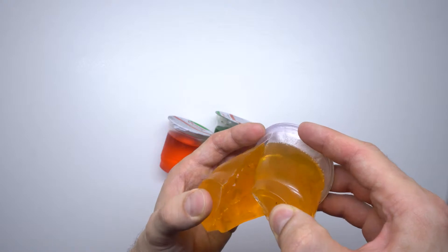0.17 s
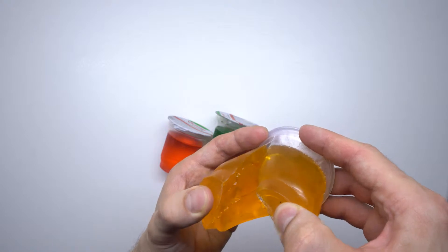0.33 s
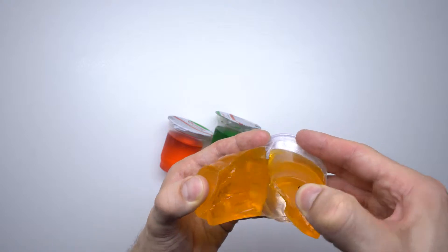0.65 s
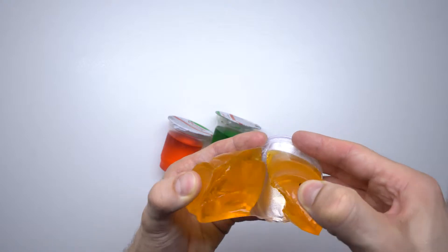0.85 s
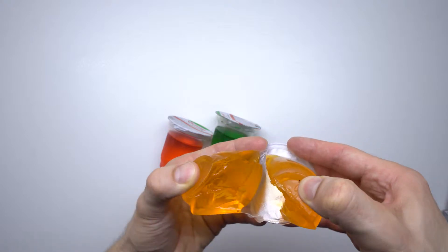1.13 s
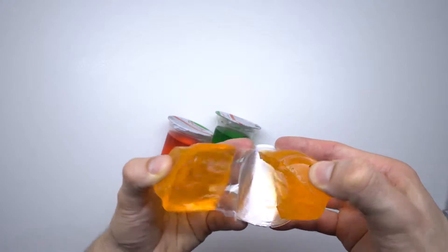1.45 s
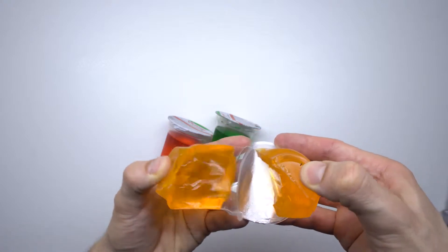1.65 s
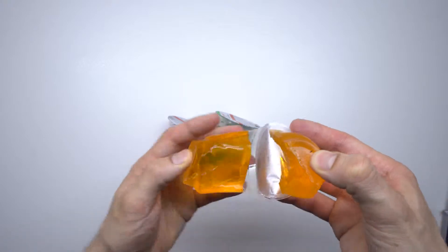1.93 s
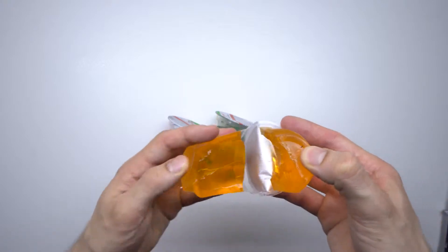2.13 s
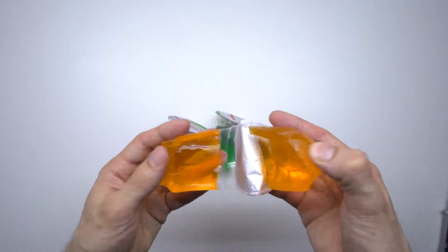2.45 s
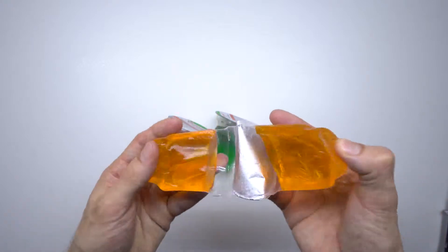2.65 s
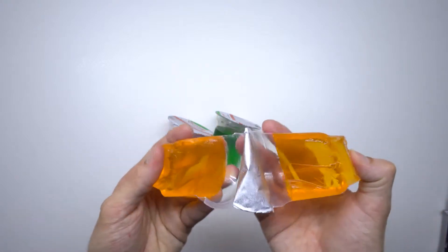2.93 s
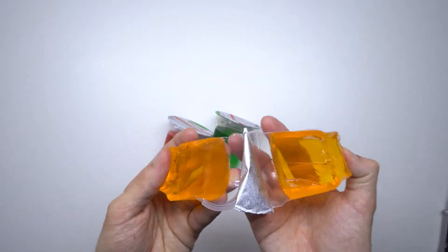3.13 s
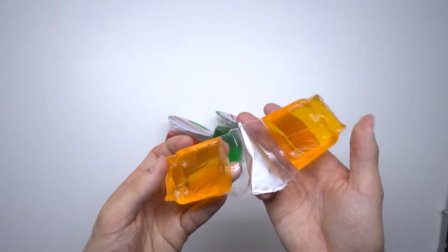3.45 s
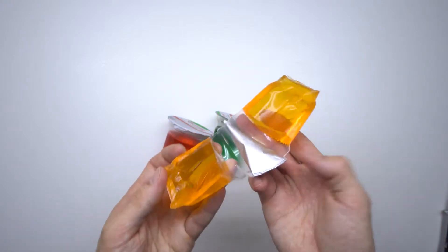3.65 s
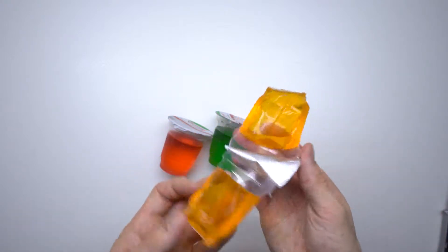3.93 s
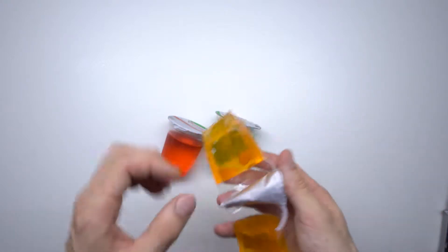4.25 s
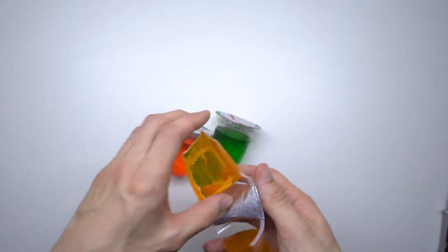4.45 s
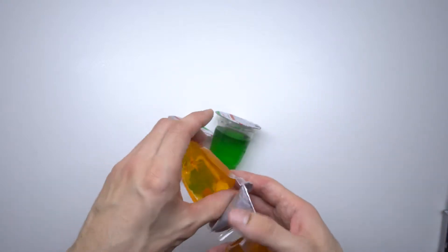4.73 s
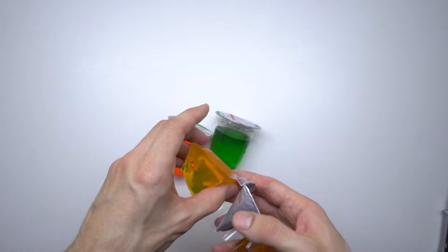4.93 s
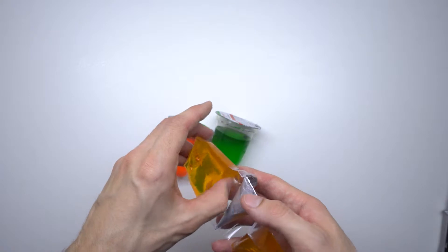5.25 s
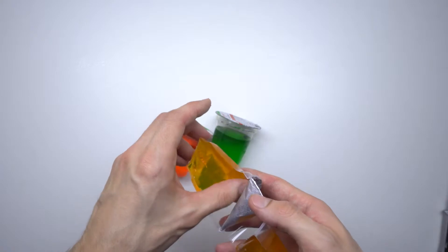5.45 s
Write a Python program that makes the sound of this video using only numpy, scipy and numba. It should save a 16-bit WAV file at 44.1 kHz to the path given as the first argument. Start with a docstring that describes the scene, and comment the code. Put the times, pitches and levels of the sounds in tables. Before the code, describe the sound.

Close, sharp plastic snaps and crackling as fingers pull a foil-lidded jelly cup apart in a small echoing room.

```python
"""In a small echoing room, close by, two hands pull apart thin plastic cups of jelly.
Cup walls buckle with loud snaps, the lid seam crackles as it slips, and fingers rub over plastic
and foil. Air pockets in the jelly pop, and soft bumps set a cup ringing, all over a faint hiss and hum.
A limiter turns the sound down on the hardest snaps, so the room swells up behind them."""
import sys
import numpy as np
from scipy import signal
from scipy.fft import rfft, irfft
from scipy.io import wavfile
from numba import njit

SR = 44100
rng = np.random.default_rng(int(sys.argv[2]) if len(sys.argv) > 2 else 0)


def put_to_file(sound):
    """Save the sound as 16-bit audio at rate SR, in the file named by the first command-line argument."""
    columns = np.atleast_2d(sound).T  # one column per channel
    safe = np.clip(columns, -1, 1)
    whole_steps = np.round(safe * 32767)
    wavfile.write(sys.argv[1], SR, whole_steps.astype(np.int16))


N = 246060
T = np.arange(N) / SR
RING_TIME = T[:4096]  # the seconds over which one blow rings
IMPULSE = signal.unit_impulse(len(RING_TIME))
# the tone of a cracking crease: pitch_hz, level_db
CREASE_TONE = [(200, -9), (700, -16.5), (1300, -3), (2300, 3.5), (3600, -1), (5200, 1), (7000, -4),
               (8500, -0.5), (11000, -8), (13000, -5), (15000, -2), (16500, -51)]


def gain(db):
    """Turn decibels into a number to multiply by."""
    return 10 ** (np.asarray(db) / 20)


def unit(x):
    """Scale a sound to an average strength (rms) of 1."""
    return x / np.sqrt(np.mean(x ** 2) + 1e-18)


def add(track, start_s, sound):
    """Mix a sound into a track."""
    i = max(int(start_s * SR), 0)
    track[i:i + len(sound)] += sound[:max(N - i, 0)]


def fade(fade_s, t=RING_TIME):
    """Die away by 60 dB in fade_s seconds."""
    return np.exp(-np.log(1000) * t / max(fade_s, 1e-4))


def colour(x, tone, size=2048):
    """Filter a sound to follow a tone curve of (pitch_hz, level_db) points."""
    hz, db = np.transpose(tone)
    freqs = np.maximum(np.fft.rfftfreq(size, 1 / SR), 1)
    cepstrum = irfft(np.log(gain(np.interp(np.log(freqs), np.log(hz), db))))
    cepstrum[1:size // 2] *= 2  # folded so the filter rings only after a hit
    cepstrum[size // 2 + 1:] = 0
    return signal.fftconvolve(x, irfft(np.exp(rfft(cepstrum))))[:len(x)]


def resonate(x, hz, width_hz):
    """Keep the part of a sound near one pitch."""
    return signal.lfilter(*signal.iirpeak(hz, hz / width_hz, fs=SR), x)


def split_bands(x):
    """Split a sound into equally strong bass, middle and treble."""
    bands = [(250, 1200), (1200, 4000), (4000, 17000)]  # low_hz, high_hz
    return [unit(signal.sosfilt(signal.butter(3, b, "band", fs=SR, output="sos"), x)) for b in bands]


def wander(t, per_s):
    """Drift to a new random value per_s times a second."""
    return np.interp(t * per_s, np.arange(len(t)), rng.standard_normal(len(t)))


def background():
    """Steady hiss and rumble with a wavering low hum."""
    # the tone of the quiet room: pitch_hz, level_db
    air_tone = [(12, -26), (20, 0.5), (130, -7), (172, -6), (204, -8.5), (337, -12.5), (499, -14),
                (624, -17.5), (1120, -23.5), (1330, -20.5), (3250, -28), (8650, -32), (16000, -37.5)]
    air = unit(colour(rng.standard_normal(N), air_tone, size=8192))
    hum = unit(resonate(rng.standard_normal(N), hz=50, width_hz=9))
    return gain(-45) * air + gain(-50) * hum


def burst(tick_s, tail_s, tail_db):
    """A thin sheet lets go sharply, then shivers for a moment."""
    return rng.standard_normal(len(RING_TIME)) * (fade(tick_s) + gain(tail_db) * fade(tail_s))


def foil_ticks(ticks_per_s=14):
    """Foil ticks faintly between the fingers at random moments."""
    moments = rng.random(N) < ticks_per_s / SR
    strength = gain(-44 + 4 * np.minimum(rng.exponential(size=N), 3))
    tick = colour(burst(tick_s=0.0053, tail_s=0.02, tail_db=-34), CREASE_TONE)
    return signal.fftconvolve(moments * strength, tick)[:N]


def crease_crack(push, edge_hz):
    """A crease flips with a noisy crack; softer ones have a lower edge_hz and sound duller."""
    return unit(signal.lfilter(*signal.butter(1, edge_hz, fs=SR), colour(push, CREASE_TONE)))


def thin_wall(x, corner_hz):
    """A small thin wall gives off little sound below corner_hz."""
    return signal.lfilter(*signal.butter(2, corner_hz, "high", fs=SR), x)


def wall_snaps(body_hz=170):
    """A cup wall flips: it cracks, rings and pushes air. Returns the close sound and the room's share."""
    # buckling walls: start_s, level_db, pitch_hz, fade_s, crack_db, edge_hz, thump_db, room_db
    snaps = [(0.1173, 7.5, 1960, 0.0031, 0.5, 11600, -20, -1), (1.506, 11, 1852, 0.01, 1.5, 4860, -4, -11),
             (1.5179, 4.5, 2080, 0.0037, 5, 7400, -33, -0.5),
             (1.879, -21.5, 2880, 0.013, -2.5, 3870, -46, 1),
             (2.715, -15, 1494, 0.027, 1.5, 3350, -17, 2.5), (3.0883, -23, 2790, 0.027, 1, 9100, -53, 5),
             (4.6095, -20, 3210, 0.014, -6, 6000, -44, 8.5), (4.65, -26, 1970, 0.068, -13, 4000, -18, 9),
             (4.6581, -14.5, 3610, 0.025, -6.5, 6000, -51, -1),
             (4.6767, -20.5, 2180, 0.015, -20, 4000, -33, -2),
             (4.7207, -12.5, 1425, 0.041, 0.5, 4070, -27, 6),
             (5.4423, -13.5, 2326, 0.029, -4, 3900, -26, 3.5),
             (5.4565, -17.5, 2220, 0.0086, -5.5, 3260, -32, 6),
             (5.544, -14, 2204, 0.039, -12, 2490, -58, 5.5), (5.5532, -15, 4080, 0.024, 4, 8500, -53, 2)]
    # a wall's side notes around its main one: pitch_ratio, level_db
    side_notes = [(0.678, -7), (0.86, -14), (1.216, -3), (1.501, -10.5)]
    near, far = np.zeros(N), np.zeros(N)
    thump = unit(resonate(IMPULSE, hz=270, width_hz=380))
    for start_s, db, hz, fade_s, crack_db, edge_hz, thump_db, room_db in snaps:
        phase = 2 * np.pi * hz * RING_TIME
        sides = sum(gain(d) * rng.choice([-1, 1]) * np.sin(ratio * phase) for ratio, d in side_notes)
        side_db = 5.5 - 400 * fade_s  # a long ring is a pure one
        ring = unit((np.sin(phase) + gain(side_db) * sides) * fade(fade_s))
        crack = crease_crack(burst(tick_s=0.012, tail_s=0.062, tail_db=-13), edge_hz)
        corner_hz = np.sqrt(body_hz * edge_hz)  # a smaller, sharper crease has less body
        snap = thin_wall(ring + gain(crack_db) * crack, corner_hz)
        add(near, start_s, gain(db) * (snap + gain(thump_db) * thump))
        # the room gathers the crack from all sides, which evens out its tone
        even_snap = gain(-0.5) * ring + gain(crack_db) * crease_crack(IMPULSE, edge_hz)
        add(far, start_s, gain(db + room_db) * thin_wall(even_snap, corner_hz))
    return near, far


def seam_slip(start_s, db, treble_db, rim_hz=1650, overtone_hz=3650):
    """One slip of the seam ticks and rings two notes of the cup's rim."""
    # the tone of the seam: pitch_hz, level_db
    seam_tone = [(150, -68), (250, -17), (444, -8), (1010, -7.5), (1100, 3), (1260, -2.5), (1640, 14.5),
                 (2130, 3), (3580, 0.5), (4410, -3.5), (5160, -3), (8850, -7), (11500, -13), (13700, -11.5),
                 (16000, -11.5)]
    # bass in a slip, fullest while the cup is squeezed shut: time_s, bass_db
    bass_curve = [(0.68, -4.5), (0.77, -1), (0.94, 0.5), (1.2, -7), (1.33, -12), (2.37, 4), (3.0, -15.5),
                  (4.2, -11)]
    tick = unit(colour(burst(tick_s=0.0015, tail_s=0.053, tail_db=-20), seam_tone))
    bend = 1 + 0.028 * rng.standard_normal()  # the rim bends a little differently each time
    turn = 2 * np.pi * bend * RING_TIME
    rim = unit((np.sin(rim_hz * turn) + gain(-9) * np.sin(overtone_hz * turn)) * fade(0.03))
    bass, middle, treble = split_bands(tick + gain(-8) * rim)
    bass_db = np.interp(start_s, *np.transpose(bass_curve))
    return gain(db - 10) * (middle + gain(bass_db) * bass + gain(treble_db) * treble)


def seam_crackles(gap_s=0.024, jitter=0.2, spread_db=6):
    """The seam lets go in single slips, and creeps in uneven runs of small ones."""
    # single slips of seam and foil: start_s, level_db, treble_db
    slips = [(0.6508, -30.5, -0.5), (0.6874, -29.5, -7.5), (0.712, -40, 0), (0.7332, -15.5, -2),
             (0.7417, -14, -1.5), (0.756, -14, -6), (0.7609, -15.5, 1.5), (0.7707, -17.5, -8),
             (0.8353, -21, -2), (0.898, -24, -2.5), (0.9007, -14.5, -2.5), (0.9098, -15, -3),
             (0.9201, -22, -8), (0.9321, -21.5, -4), (0.9632, -17.5, 9), (0.9744, -29, 14.5),
             (1.1217, -29.5, -14), (1.1903, -17, 1), (1.2246, -16, -6.5), (1.278, -13, -9.5),
             (1.2996, -18, -6), (1.3111, -13, -10), (1.3317, -10.5, 0), (1.341, -13.5, -29),
             (1.8094, -27, -6), (2.1125, -35.5, -6), (2.3698, -37.5, -5.5), (2.6302, -34, -8),
             (2.6906, -39.5, -0.5), (3.006, -27, -18), (3.5009, -25, -18), (4.0434, -39, 1.5),
             (4.18, -33, -9), (4.205, -32, -6), (4.28, -36, -14), (4.5336, -17.5, -10), (4.9663, -49.5, 6),
             (5.1182, -59, 9), (5.179, -45.5, -17)]
    # runs of slips under a steady pull: start_s, length_s, level_db, treble_db
    creeps = [(0.457, 0.04, -37.5, -1.5), (0.715, 0.07, -43, 0), (1.247, 0.09, -40, -21),
              (2.127, 0.1, -48.5, -15), (2.77, 0.1, -38, -6), (3.388, 0.18, -32, -8)]
    out = np.zeros(N)
    for start_s, db, treble_db in slips:
        add(out, start_s, seam_slip(start_s, db, treble_db))
    for start_s, length_s, db, treble_db in creeps:
        for k, (late, louder) in enumerate(rng.standard_normal(size=(10, 2))):
            slip_s = start_s + (k + jitter * late) * gap_s
            pulling = k * gap_s < length_s
            add(out, slip_s, pulling * seam_slip(slip_s, db + spread_db * louder, treble_db))
    return out


def finger_pressure(t, length_s, swell_db, grab_s=0.0041, let_go_s=0.063):
    """A finger takes hold, presses harder or eases off, and lets go."""
    grab = 1 - np.exp(-t / grab_s)
    hold = gain(swell_db * (np.minimum(t / length_s, 1) - 0.5))
    return grab * hold * fade(let_go_s, np.maximum(t - length_s, 0))


def finger_rubs(slips_per_s=1300, catches_per_s=45, detune=0.0374):
    """Many tiny slips shake the sheet and the cup; sticky skin catches now and then."""
    # skin and foil sliding on plastic: start_s, length_s, level_db, swell_db, bass_db, treble_db
    strokes = [(0.935, 0.033, -20, -10, 4, 0.5), (2.009, 0.01, -39.5, 10, -2, 5),
               (2.899, 0.11, -34, 10.5, -33, -4), (3.135, 0.019, -27.5, 14.5, -24, -3),
               (3.218, 0.12, -24, -2, -12.5, -4.5), (3.347, 0.078, -18.5, 2, -20, -5.5),
               (3.499, 0.044, -20, -17, -25, -12.5), (3.535, 0.073, -23.5, 8.5, -15.5, -7),
               (3.745, 0.1, -29, 12, -21, -7), (3.814, 0.015, -13.5, 3.5, -15, -2.5),
               (4.056, 0.099, -33, 0, -10, -6.5), (4.22, 0.051, -26.5, -7.5, -10.5, -11.5),
               (4.302, 0.021, -34.5, 8, -24, -13), (4.53, 0.036, -11, 5.5, -15, -4.5),
               (4.584, 0.15, -16.5, 2, -6.5, -5.5), (5.276, 0.031, -44, -2, -24, -14),
               (5.357, 0.022, -25, 0, -28, -0.5), (5.409, 0.0097, -40, -2, -11, -16)]
    # the notes of the held cup: pitch_hz, width_hz, level_db
    cup_notes = [(1670, 260, 2.5), (2176, 76, 3), (2380, 21, -24), (3027, 204, 2), (4000, 180, -9),
                 (4550, 27, -16), (5420, 99, -33), (6000, 26, -16)]
    # the tone of rubbing: pitch_hz, level_db
    rub_tone = [(180, -68), (300, -38), (519, -10), (574, -48), (1640, -6.5), (1900, 2), (2840, 18.5),
                (3460, -21.5), (4230, -25), (7080, -35.5), (8500, -5.5), (16000, -70.5)]
    out, t = np.zeros(N), T[:SR // 2]
    for start_s, length_s, db, swell_db, bass_db, treble_db in strokes:
        slips = (rng.random(len(t)) < slips_per_s / SR) * rng.choice([-1, 1], len(t))
        slips = slips * gain(3 * np.minimum(rng.exponential(size=len(t)), 4))
        sheet_ring = rng.standard_normal(len(RING_TIME)) * fade(0.055)
        sheet = signal.fftconvolve(slips, sheet_ring)[:len(t)]
        shake = unit(slips) + gain(-1) * unit(sheet)
        # each hold tunes the cup and the rubbing a little differently
        cup = sum(gain(d) * resonate(shake, hz * (1 + detune * rng.standard_normal()), width_hz)
                  for hz, width_hz, d in cup_notes)
        stiffness = 1 + detune * rng.standard_normal()
        skin = colour(shake, [(hz * stiffness, d) for hz, d in rub_tone])
        catch_moments = rng.random(len(t)) < catches_per_s / SR
        catch = colour(burst(tick_s=0.0089, tail_s=0.017, tail_db=-7), CREASE_TONE)
        catches = signal.fftconvolve(catch_moments, catch)[:len(t)]
        grip = gain(2.2 * wander(t, per_s=130))  # an uneven grip bunches the slips
        sliding = grip * (unit(skin) + gain(-1) * unit(cup))
        bass, middle, treble = split_bands(sliding + gain(-17) * unit(catches))
        contact_db = 3 * wander(t, per_s=65)  # the touch turns harder and softer
        rub = middle + gain(bass_db) * bass + gain(treble_db + contact_db) * treble
        add(out, start_s, gain(db - 1) * finger_pressure(t, length_s, swell_db) * rub)
    return out


def jelly_pops(rise_s=0.00093):
    """Air pockets open with a soft start and a short hollow ring."""
    # pockets opening between jelly and cup: start_s, level_db, pitch_hz, fade_s
    pops = [(0.945, -14, 980, 0.013), (1.116, -30, 765, 0.014), (1.433, -6.5, 1055, 0.007),
            (1.677, -10.5, 1176, 0.011), (1.7452, -17.5, 824, 0.013), (1.85, -11, 876, 0.013),
            (1.865, -28, 546, 0.034), (2.572, -37, 522, 0.022), (2.5892, -18, 1132, 0.019),
            (3.052, -43, 480, 0.02)]
    # the notes of one pocket: pitch_ratio, level_db
    pocket_notes = [(1, 13), (1.45, 8), (1.68, -1), (2.4, -5)]
    out = np.zeros(N)
    for start_s, db, hz, fade_s in pops:
        ring = sum(gain(d) * np.sin(2 * np.pi * hz * ratio * RING_TIME) for ratio, d in pocket_notes)
        add(out, start_s, gain(db + 1) * ring * fade(fade_s) * (1 - np.exp(-RING_TIME / rise_s)))
    return out


def cup_knocks(rise_s=0.015):
    """Soft bumps set the whole cup ringing."""
    # bumps on the cup: start_s, level_db, pitch_ratio
    knocks = [(3.829, -22.5, 0.99), (3.846, -35, 0.95), (4.535, -29, 1.15), (4.56, -23.5, 1.02),
              (4.613, -24, 1)]
    # the notes of the whole cup: pitch_hz, level_db, fade_s
    shell_notes = [(532.4, -0.5, 0.16), (844, -13, 0.23), (1040, -2, 0.1), (1480, 12, 0.055),
                   (2045, 13, 0.13), (2550, -21, 0.055)]
    out, t = np.zeros(N), T[:SR // 4]
    for start_s, db, ratio in knocks:
        ring = sum(gain(d) * np.sin(2 * np.pi * (ratio * hz * t + rng.random())) * fade(fade_s, t)
                   for hz, d, fade_s in shell_notes)
        add(out, start_s, gain(db) * ring * (1 - np.exp(-t / rise_s)))
    return out


def hand_shift(peak_s=5.0, swell_s=0.11, hz=150, width_hz=140):
    """One hand shifts its hold with a soft low rustle."""
    rustle = resonate(resonate(rng.standard_normal(N), hz, width_hz), hz, width_hz)
    swell = np.exp(-((T - peak_s) / swell_s) ** 2)
    return gain(-46) * swell * unit(rustle)


def room_echo(x, build_s=0.0009, size=32768):
    """Echoes build up quickly and blur together; the deepest last longest."""
    # how the room rings: pitch_hz, level_db, fade_s
    room_bands = [(148, 0, 0.73), (516, 6.5, 0.27), (1410, 2, 0.36), (2520, -2, 0.44), (4840, -2.5, 0.35),
                  (8900, -2.5, 0.32), (15300, -6.5, 0.21)]
    t, freqs = T[:size], np.fft.rfftfreq(size, 1 / SR)
    noise = rfft(rng.standard_normal(size))
    centres = np.log([row[0] for row in room_bands])
    echo = 0
    for share, (_, db, fade_s) in zip(np.eye(len(room_bands)), room_bands):
        band = irfft(noise * np.interp(np.log(freqs + 1), centres, share))
        echo = echo + gain(db) * band * fade(fade_s, t)
    return signal.fftconvolve(x, echo * (1 - np.exp(-t / build_s)))[:N]


@njit
def limiter(x, top, attack_s, hold_s, release_s):
    """The volume drops quickly when the sound passes the top, waits a moment, and creeps back."""
    y, volume, wait = np.empty(len(x)), 1., 0.
    for i in range(len(x)):
        wanted = min(1., top / (abs(x[i]) + 1e-9))
        wait -= 1
        if wanted < volume:
            volume += (wanted - volume) / (1 + attack_s * SR)
            wait = hold_s * SR
        elif wait < 0:
            volume += (1 - volume) / (1 + release_s * SR)
        y[i] = volume * x[i]
    return y


def scene():
    """Mix everything in the hands with the room's echo and background."""
    snaps, far_snaps = wall_snaps()
    crackles = seam_crackles() + foil_ticks()
    pops = jelly_pops()
    touches = finger_rubs() + cup_knocks()
    echo = room_echo(far_snaps + gain(-2) * crackles + gain(-5) * pops + gain(-1) * touches)
    return (snaps + crackles + pops + touches + hand_shift() + gain(-40) * echo + background())[None]


def record(dry, top_hz=15550):
    """The limiter is too slow for the start of a hard snap, which clips; the highest treble is cut."""
    held = limiter(dry[0], top=1.0, attack_s=0.00026, hold_s=0.018, release_s=0.067)
    treble_cut = signal.ellip(8, 0.2, 70, top_hz, fs=SR, output="sos")
    return signal.sosfilt(treble_cut, np.clip(held, -1, 1))[None]


dry = scene()
out = record(dry)
put_to_file(out)
```